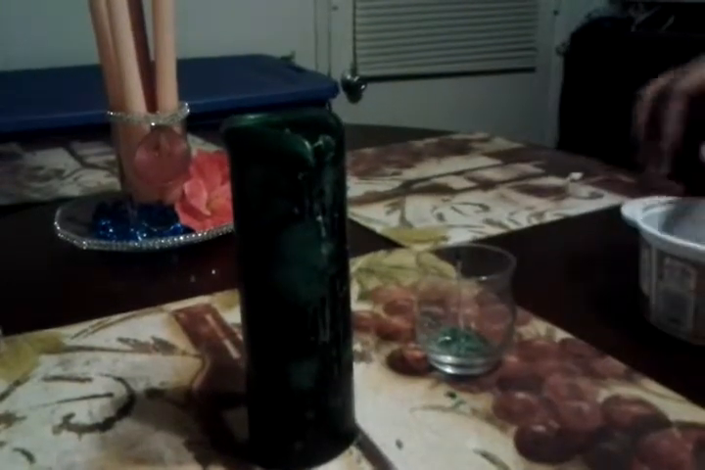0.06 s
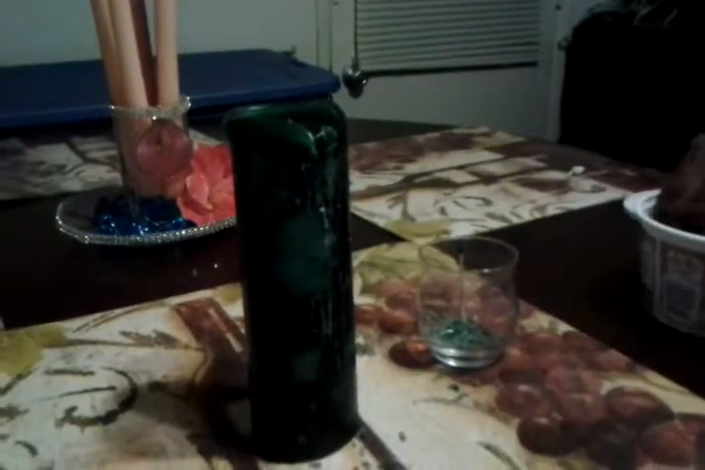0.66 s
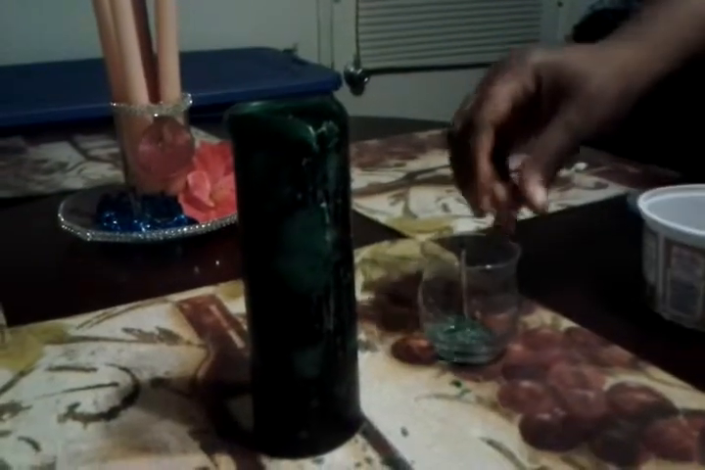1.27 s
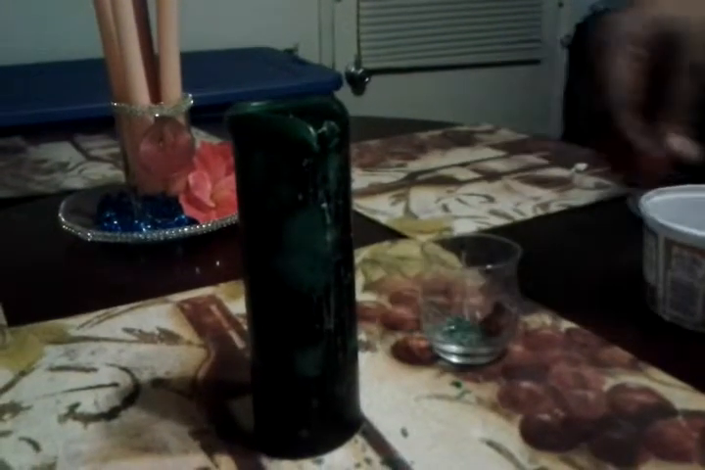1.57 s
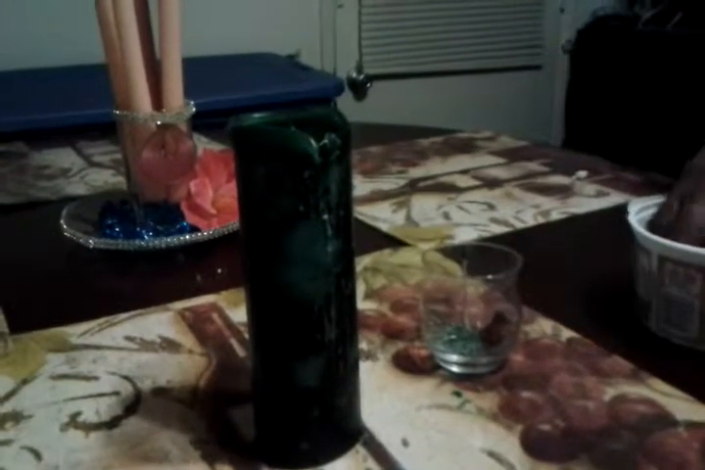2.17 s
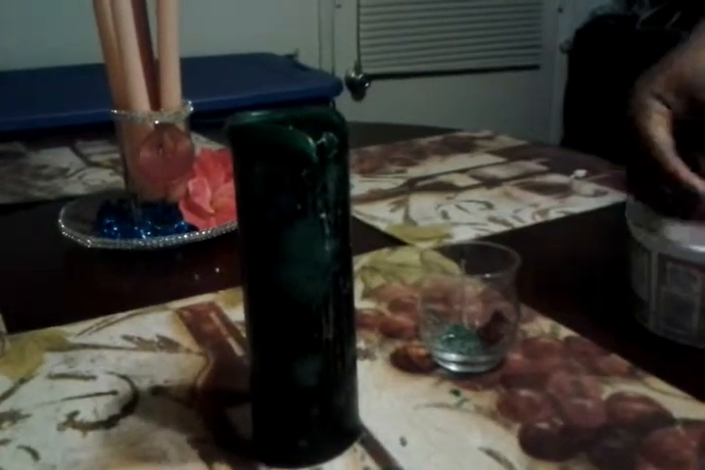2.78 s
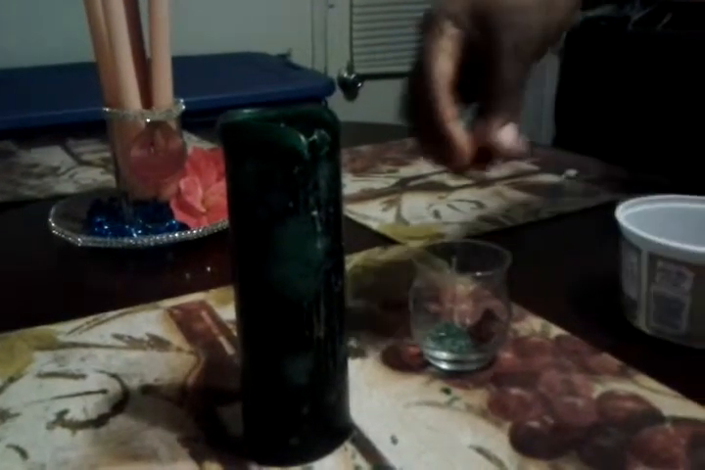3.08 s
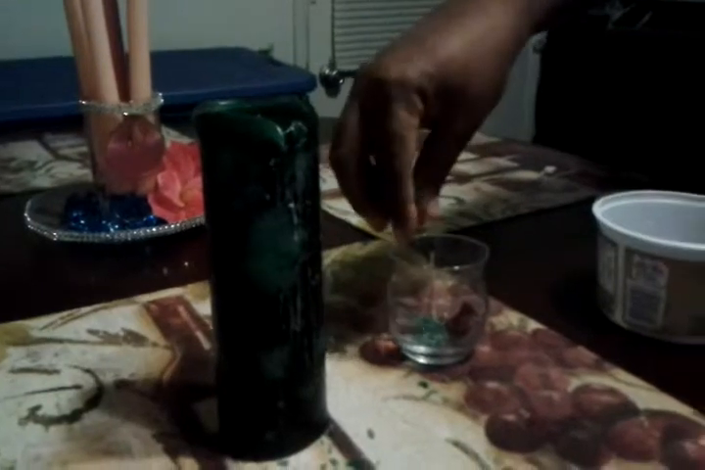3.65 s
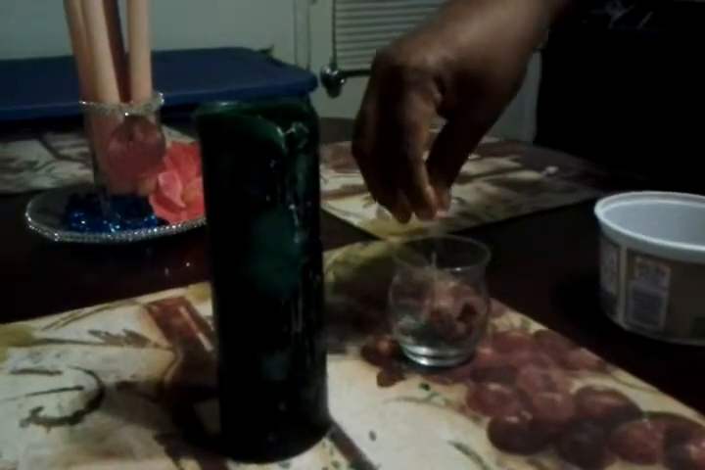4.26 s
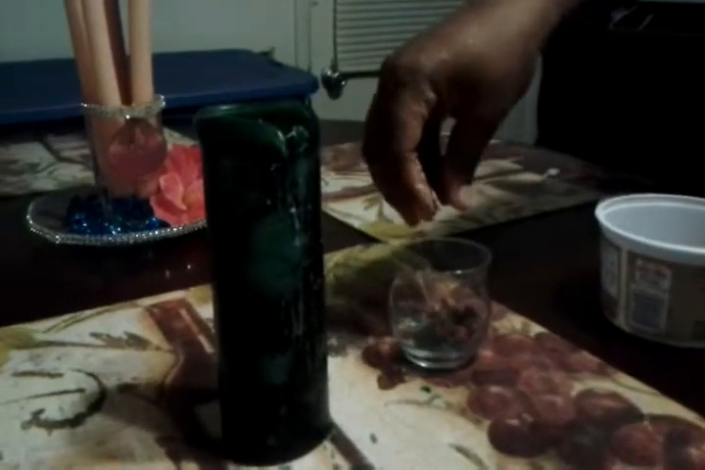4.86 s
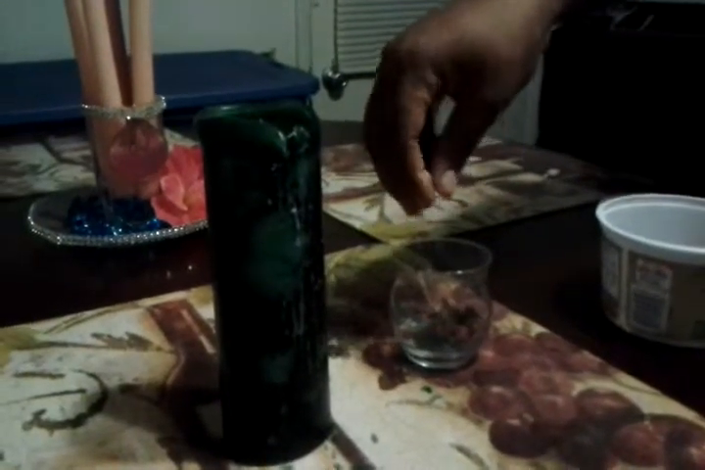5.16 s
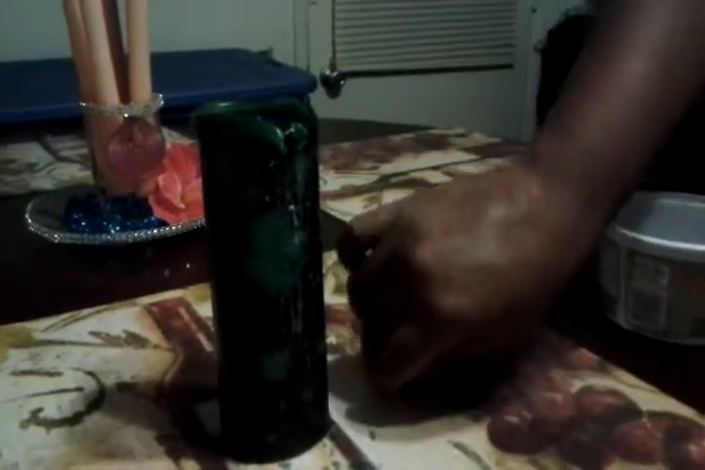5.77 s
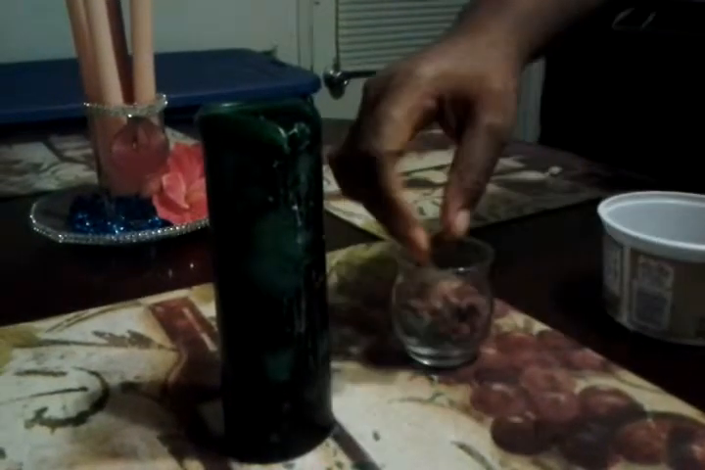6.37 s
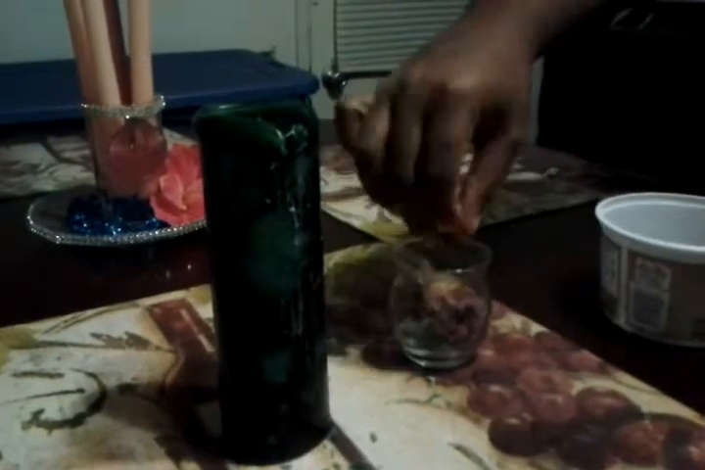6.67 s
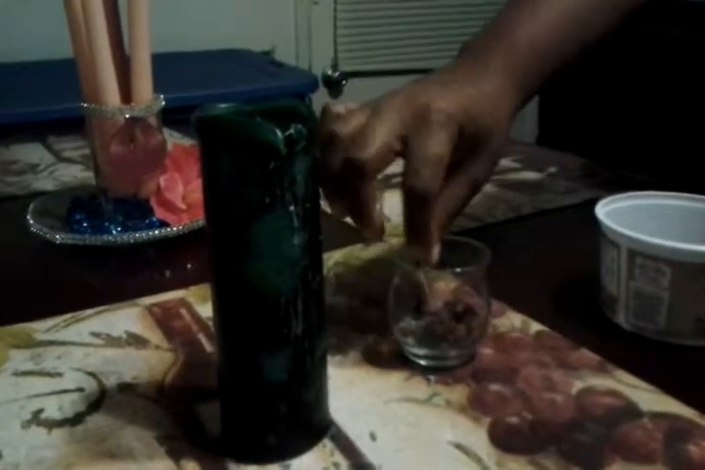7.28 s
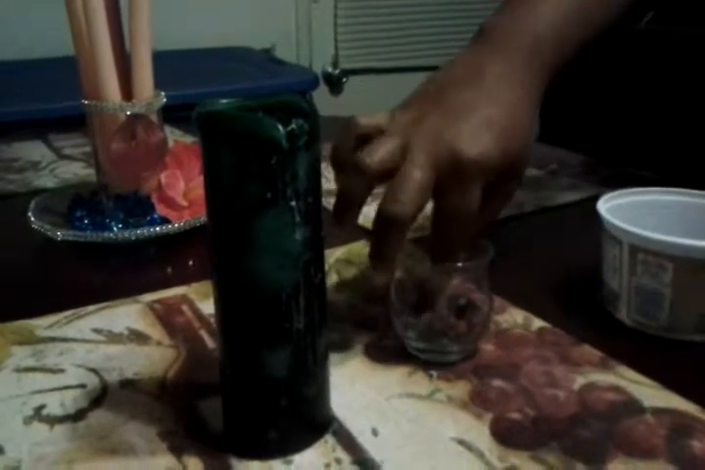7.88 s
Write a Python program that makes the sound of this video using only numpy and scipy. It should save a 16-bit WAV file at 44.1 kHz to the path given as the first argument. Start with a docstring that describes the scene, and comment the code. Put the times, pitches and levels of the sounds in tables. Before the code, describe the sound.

Fingers rummage through wax pieces in a plastic tub, making light crackles and clicks. Bits snap off crisply and drop into a nearby glass holder, pinging the wall and tapping the bottom. Midway, one heavy piece lands with a loud crack, bounces and jolts the table. Later pings are shorter and duller, with faint rubbing and another snap. The small room echoes slightly over low air rumble and microphone hiss.

```python
"""Fingers rummage in a plastic tub of wax pieces, over a low air rumble and microphone hiss.
They snap bits off and drop them into a glass holder on a cloth-covered table. The bits ping the
glass wall, bounce and knock on the bottom; the growing heap, then the fingers, shorten the ringing.
Wax rubs softly over the glass, and one heavy piece jolts the table. A small room echoes the sounds."""
import sys
import numpy as np
from scipy import signal
from scipy.fft import rfft, irfft
from scipy.io import wavfile
from scipy.ndimage import uniform_filter1d

SR = 44100
rng = np.random.default_rng(int(sys.argv[2]) if len(sys.argv) > 2 else 0)


def unload_audio(sound):
    """Save the sound as a 16-bit wav file, at the path given as the first command line argument."""
    columns = np.transpose(np.atleast_2d(sound))
    # keep every value between -1 and 1, then stretch to whole-number steps
    steps = np.round(np.clip(columns, -1, 1) * 32767)
    wavfile.write(sys.argv[1], SR, steps.astype(np.int16))


N = 350154
TIME = np.arange(N) / SR


def from_db(db):
    """Turn decibels into a gain."""
    return 10 ** (np.asarray(db) / 20)


def rms_one(x):
    """Scale a sound to an average strength (rms) of 1."""
    return x / np.sqrt(np.mean(x ** 2) + 1e-20)


def at_hz(points, hz):
    """Read between the rows of a table, with frequency spaced in octaves."""
    freqs, values = np.transpose(points)
    return np.interp(np.log(np.maximum(hz, 1)), np.log(freqs), values)


def colour(x, spectrum, size=4096):
    """Give a sound a tone colour from rows of f/Hz, level/dB (a minimum-phase filter)."""
    cepstrum = irfft(np.log(from_db(at_hz(spectrum, np.fft.rfftfreq(size, 1 / SR)))))
    cepstrum[1:size // 2] *= 2
    cepstrum[size // 2 + 1:] = 0   # nothing sounds before the blow
    return signal.fftconvolve(x, irfft(np.exp(rfft(cepstrum))))[:len(x)]


def add(out, s, sound):
    """Mix a short sound in at s seconds."""
    start = max(round(s * SR), 0)
    out[start:start + len(sound)] += sound[:N - start]


def unit_hit(sound, ms):
    """Give a blow the energy of a level of 1 held for ms milliseconds."""
    return sound / np.sqrt(np.sum(sound ** 2) * 1000 / (ms * SR))


def evened(burst, width_hz):
    """Level out the chance peaks in a noise burst's tone, so that only the struck body colours it."""
    power = uniform_filter1d(np.abs(rfft(burst)) ** 2, max(round(width_hz * len(burst) / SR), 1))
    freqs = np.fft.rfftfreq(len(burst), 1 / SR)
    return colour(burst, np.column_stack([freqs, -10 * np.log10(power + 1e-9)])[1:])


def effort(strokes, attack_db_per_s=1295, sag_db_per_s=58, release_db_per_s=326):
    """How hard the fingers work: each stroke bites quickly, eases and lets go."""
    gain = np.zeros(N)
    for s, length, db in strokes:
        t = TIME - s
        fall_db = (attack_db_per_s * np.maximum(-t, 0) + sag_db_per_s * np.maximum(t, 0)
                   + release_db_per_s * np.maximum(t - length, 0))
        gain += from_db(db - np.minimum(fall_db, 120))
    return gain


def rustle(gain, spectrum, per_s, spread_db):
    """Tiny random slips of uneven size, as strong as the fingers' effort."""
    sizes = from_db(spread_db * np.minimum(rng.exponential(1, N), 4))
    slips = sizes * rng.choice([-1, 1], N) * (rng.random(N) < per_s / SR)
    return gain * rms_one(colour(slips, spectrum))


def ring(hz, t60, size=22050):
    """One struck tone; its ring time t60 is the seconds it takes to fade by 60 dB."""
    return np.sin(2 * np.pi * hz * TIME[:size]) * from_db(-60 * TIME[:size] / t60)


def contact(spectrum, ms, crumble, size=4096):
    """A click: a sharp touch, then a brief crumbling of the wax."""
    fade = np.exp(-(1000 * TIME[:size] / max(ms, .1)) ** 2)
    force = crumble * rng.standard_normal(size) * fade
    force[0] = 1
    return unit_hit(colour(evened(force, width_hz=900), spectrum), ms=0.25)


def thud(spectrum, t60, size=8192):
    """A struck body whose many close tones die fast and blur into noise."""
    burst = rng.standard_normal(size) * from_db(-60 * TIME[:size] / t60)
    return unit_hit(colour(evened(burst, width_hz=90), spectrum), ms=2)


# The fingers dig into the tub: t/s, length/s, level/dB (levels in the tables are relative)
TUB_DIGS = [(0.003, 0.011, -39.5), (.285, .025, -53), (.48, 0.046, -43.5), (.58, 0.08, -49.5),
            (.672, 0.021, -45.5), (.79, .1, -51), (1.826, 0.076, -37.5), (1.94, 0.015, -25.5),
            (2.08, 0.04, -38.5), (2.2, 0.051, -41), (2.335, 0.014, -29), (2.45, 0.096, -41.5),
            (2.572, 0.13, -40)]
# Tone colour of wax moving in the tub: f/Hz, level/dB
TUB_COLOUR = [(100, -32), (260, -16), (500, -24.5), (850, -5), (1250, -17), (1700, -14), (2100, -9.5),
              (2700, -15.5), (4400, -4.5), (5600, -3), (6700, 1.5), (7600, -3.5), (8800, -27.5)]
# The loudest clicks of pieces in the tub: t/s, level/dB, f/Hz
TUB_CLICKS = [(.0074, -26, 6740), (0.4746, -33, 6000), (.483, -27, 5550), (.5143, -24.5, 5500),
              (.618, -29, 4740), (0.677, -25.5, 6700), (.701, -20.5, 5450), (.7308, -23, 4800),
              (.751, -21, 5660), (0.857, -20.5, 6300), (0.9157, -23, 6700), (1.8257, -13, 6800),
              (1.923, -14.5, 6700), (1.9499, -9.5, 6560), (1.9515, -3, 5700), (1.954, -6.5, 6300),
              (2.074, -23, 4860), (2.1562, -18.5, 6200), (2.176, -18, 6000), (2.2077, -13.5, 4800),
              (2.231, -30, 5600), (2.3248, -16, 5000), (2.3414, -17.5, 4650), (2.354, -20, 6600),
              (2.569, -24, 6600), (2.627, -24, 5800), (2.645, -23.5, 5700), (2.6778, -19.5, 6160),
              (2.686, -24, 6100)]
# The hand bumps the tub: t/s, level/dB
TUB_BUMPS = [(0.926, -40), (1.823, -29), (1.95, -26), (2.34, -34), (2.68, -40)]
# Tone colour of the plastic wall: f/Hz, level/dB
PLASTIC_COLOUR = [(80, -20), (270, 3), (480, -6), (820, 5), (1150, -2.5), (1450, -28), (1850, 1),
                  (3000, -12)]
def tub(peak_db=7.0, peak_octaves=0.33):
    """Digging scrapes, crackles and rings the air in the tub; pieces click and the hand bumps it."""
    digging = effort(TUB_DIGS)
    scrape = from_db(-3) * rustle(digging, TUB_COLOUR, per_s=800, spread_db=2.5)
    crackle = from_db(-9) * rustle(digging, TUB_COLOUR, per_s=110, spread_db=4.0)
    hollow = from_db(-42.5) * signal.fftconvolve(scrape + crackle, ring(hz=875, t60=0.092))[:N]
    out = scrape + crackle + hollow
    freqs = np.geomspace(100, 10000, 90)
    for s, db, hz in TUB_CLICKS:
        own_pitch = peak_db * np.exp(-(np.log2(freqs / hz) / peak_octaves) ** 2)
        spectrum = np.column_stack([freqs, at_hz(TUB_COLOUR, freqs) + own_pitch])
        add(out, s, from_db(db - 1.5) * contact(spectrum, ms=2.4, crumble=1.0))
    for s, db in TUB_BUMPS:
        add(out, s, from_db(db) * thud(PLASTIC_COLOUR, t60=0.069))
    return out


# Tone colour of the air rumble: f/Hz, level/dB
RUMBLE_COLOUR = [(15, -60), (25, -28.5), (118, -10.5), (176, -3), (264, -6.5), (294, -5), (326, -11),
                 (412, -7.5), (499, -10.5), (543, -11.5), (1030, -15), (1410, -17.5), (4000, -26),
                 (5200, -38), (8800, -120)]
# Tone colour of the microphone hiss: f/Hz, level/dB
HISS_COLOUR = [(2500, -18), (4000, -6), (5300, -2), (6300, 4.5), (7100, 7), (7800, -3), (8600, -9),
               (9000, -48)]
# Hum and electronic whine: f/Hz, level/dB
STEADY_TONES = [(291, -69.5), (538, -74), (6164, -71), (7515, -77), (7542, -68.5), (8470, -89)]
def background(swell_from_s=7.5, swell_db_per_s=3.0):
    """Air rumble that swells slightly at the end, microphone hiss and a few faint steady tones."""
    rumble_db = -58 + swell_db_per_s * np.maximum(TIME - swell_from_s, 0)
    rumble = from_db(rumble_db) * rms_one(colour(rng.standard_normal(N), RUMBLE_COLOUR))
    hiss = from_db(-59) * rms_one(colour(rng.standard_normal(N), HISS_COLOUR))
    tones = sum(np.sqrt(2) * from_db(db) * np.sin(2 * np.pi * (hz * TIME + rng.random()))
                for hz, db in STEADY_TONES)
    return rumble + hiss + tones


# Wax snaps between the fingers: t/s, level/dB, f/Hz
SNAPS = [(1.0554, -19, 5140), (1.292, -40, 7340), (2.796, -35, 6550), (2.996, -35.5, 6700),
         (3.0116, -14.5, 5280), (3.938, -11, 6640), (4.446, -26, 6100), (5.033, -37.5, 7160),
         (5.394, -37, 7400), (5.423, -37, 7100), (5.451, -35.5, 6800), (5.668, -35, 7060),
         (6.989, -40, 7000), (6.998, -16, 6700)]
# Tone colour shared by all snaps: f/Hz, level/dB
SNAP_COLOUR = [(2800, -1), (5400, 1.5), (7100, 8), (7800, -7), (8800, -19.5)]
def snaps(high_slope=15.5, rounding_octaves=0.057, knock_db=-23.5):
    """Brittle cracks, each strongest around a pitch set by the size of the piece."""
    out, freqs = np.zeros(N), np.geomspace(400, 10000, 60)
    for s, db, hz in SNAPS:
        octaves = np.log2(freqs / hz)
        low_slope = 16 * (hz / 6500) ** 1.44   # a smaller, higher piece has less below its pitch
        slope = np.where(octaves < 0, low_slope, high_slope)   # dB per octave
        # a rounded peak at the pitch, over a weak, broad knock
        peak = (rounding_octaves - np.hypot(octaves, rounding_octaves)) * slope
        shape = np.maximum(peak, knock_db) + at_hz(SNAP_COLOUR, freqs)
        ms = 1.97 * 2 ** ((db + 18.5) / 11.5)   # a stronger snap crumbles for longer
        add(out, s, from_db(db + 0.5) * contact(np.column_stack([freqs, shape]), ms, crumble=0.2))
    return out


def waver(rate_hz, depth, size=22050):
    """A gain that wanders around 1."""
    lowpass = signal.butter(2, rate_hz, fs=SR, output="sos")
    slow = signal.sosfilt(lowpass, rng.standard_normal(2 * size))[size:]
    return 1 + depth * rms_one(slow)


# The wall's low, middle and high bell tones, each split into a pair by the uneven rim:
# lower f/Hz, upper f/Hz, ring time/s before it is multiplied by ring_factor
WALL_PAIRS = [(2000, 2041, .32), (4680, 4730, .2), (7451, 7498, .17)]
def glass_wall(levels_db, upper_share, ring_factor):
    """The wall rings in three pulsing pairs and one top tone; loose wax makes the pairs waver."""
    out = 0
    for (lower_hz, upper_hz, t60), db in zip(WALL_PAIRS, levels_db):
        lower = np.sqrt(1 - upper_share) * ring(lower_hz, ring_factor * t60)
        upper = np.sqrt(upper_share) * ring(upper_hz, ring_factor * t60)
        out = out + from_db(db) * (lower + upper) * waver(rate_hz=70, depth=.2)
    top = from_db(levels_db[-1] - 22.5) * ring(hz=8548, t60=ring_factor * 0.23)
    return from_db(-2.5) * (out + top)


# How long the wall rings as the scene goes on: t/s, ring time factor
WALL_DAMPING = [(1.5, 1.16), (4.1, 1.1), (4.75, 0.71), (4.9, 0.42), (7.0, 0.36)]
def damping(s):
    """The growing heap of wax, then the fingers, shorten the wall's ring."""
    return np.interp(s, *np.transpose(WALL_DAMPING))


# Tones of the glass base: f/Hz, level/dB, ring time/s
BASE_TONES = [(1208, -11, 0.056), (1327, -15.5, 0.07), (3560, -11, 0.037)]
# Tone colour of the base with wax lying on it: f/Hz, level/dB
BASE_COLOUR = [(60, -25), (250, -9), (420, -8.5), (600, -12.5), (850, -1), (1200, -1), (1420, -8),
               (1700, -16), (2900, -23), (3350, -9.5), (3600, 0.5), (4000, -14), (6000, -25)]
def glass_base(ring_db):
    """The base thuds and rings on; the loose wax shifts its pitch a little each time."""
    detune = 1 + 0.018 * rng.standard_normal()
    out = sum(from_db(ring_db + db) * ring(hz * detune, t60) for hz, db, t60 in BASE_TONES)
    add(out, 0, from_db(-6) * thud(BASE_COLOUR, t60=0.028))
    return out


# Tone colour of wax touching glass: f/Hz, level/dB
WAX_COLOUR = [(200, -16.5), (1000, -22), (2600, -15.5), (4000, -12), (5500, 0.5), (6800, 6.5), (7700, -1.5),
              (8800, -22)]
def wax_click():
    """A bit of wax hits the glass and crumbles a little."""
    return contact(WAX_COLOUR, ms=1.0, crumble=0.65)


# A piece hits the wall: t/s, click level/dB, ring level/dB, middle pair above low pair/dB,
# share of each pair's energy in its upper tone (0-1)
PINGS = [(1.4982, -31, -34.5, -2, 0.99), (3.751, -33, -45, -5, 0.47), (3.756, -24.5, -51, 22, 0.96),
         (3.817, -25.5, -49, 8, 0), (4.075, -38, -46.5, 1.5, 0), (4.245, -19, -41, 11, 1),
         (4.285, -21.5, -60, 18.5, .8), (4.695, -24.5, -29.5, -9, 1), (4.711, -40, -46.5, 24, 1),
         (4.753, -25.5, -33.5, 0, 0.93), (4.898, -23, -40.5, 7.5, 1), (5.282, -25.5, -55.5, 10, 1),
         (6.998, -29, -53.5, -10, .5), (7.044, -47, -40.5, 1, 0.07), (7.372, -55, -53.5, -3, 1)]
def pings():
    """A blow on the wall clicks, rings the wall and knocks the base, whose tones hardly start."""
    out = np.zeros(N)
    for s, click_db, ring_db, middle_db, upper_share in PINGS:
        pair_levels = [ring_db, ring_db + middle_db, click_db - 19.5]
        add(out, s, from_db(ring_db - 4.5) * glass_base(ring_db=-6.5))
        add(out, s, glass_wall(pair_levels, upper_share, damping(s)))
        add(out, s, from_db(click_db) * wax_click())
    return out


# A piece lands on the bottom: t/s, click level/dB, knock level/dB
LANDINGS = [(1.533, -22.5, -28), (3.870, -27.5, -43.5), (4.1332, 0.5, -18), (4.136, -6, -24.5),
            (4.154, -6, -25), (4.188, -12, -55), (4.332, -23.5, -49), (4.731, -15.5, -38),
            (4.884, -27, -39), (5.256, -30.5, -46)]
def landings(pair_levels_db=(-34.5, -25.5, -23.5)):
    """A landing clicks and knocks the base; the wall rings only faintly."""
    out = np.zeros(N)
    for s, click_db, knock_db in LANDINGS:
        add(out, s, from_db(knock_db) * glass_base(ring_db=0))
        wall = glass_wall(pair_levels_db, upper_share=0.4, ring_factor=damping(s))
        add(out, s, from_db(click_db) * wall)
        add(out, s, from_db(click_db) * wax_click())
    return out


# The fingers rub wax over the glass: t/s, length/s, level/dB
RUBS = [(1.67, 0.026, -58.5), (5.97, .08, -53.5), (6.675, 0.06, -52), (6.865, 0.011, -52)]
def rubs():
    """Wax slides over glass in a dense run of tiny slips."""
    return rustle(effort(RUBS), WAX_COLOUR, per_s=3600, spread_db=6.5)


# The heavy piece jolts the table: t/s, level/dB
JOLTS = [(4.155, -17)]
# Tone colour of the table top: f/Hz, level/dB
TABLE_COLOUR = [(25, -3), (70, 6), (140, 2.5), (250, -6), (450, 2), (700, -18), (1400, -5), (3000, -10.5)]
def table_jolt(pair_levels_db=(-4, 1, 9)):
    """The table thuds and the whole wall rings, briefly because the glass is loaded."""
    out = np.zeros(N)
    for s, db in JOLTS:
        add(out, s, from_db(db) * glass_wall(pair_levels_db, upper_share=0.1, ring_factor=0.53))
        add(out, s, from_db(db) * thud(TABLE_COLOUR, t60=0.041))
    return out


# How long the small room rings: f/Hz, ring time/s
ROOM_RING_TIMES = [(100, 0.16), (1000, 0.61), (4000, 0.37), (8000, 0.31)]
def room(x, early_db, tail_db, early_t60=0.094, gap_s=0.0043, echoes_per_s=2500, size=22050):
    """Add separate echoes from things on the table, then the short tail of the room."""
    t, tail = TIME[:size], 0
    edges_hz = np.geomspace(40, 12000, 9)
    for low, high in zip(edges_hz, edges_hz[1:]):
        bandpass = signal.butter(2, [low, high], "band", fs=SR, output="sos")
        band = signal.sosfilt(bandpass, rng.standard_normal(size))
        tail = tail + band * from_db(-60 * t / at_hz(ROOM_RING_TIMES, np.sqrt(low * high)))
    echoes = rng.standard_normal(size) * (rng.random(size) < echoes_per_s / SR)
    early = echoes * from_db(-60 * t / early_t60) * (t > gap_s)
    response = from_db(early_db) * rms_one(early) + from_db(tail_db) * rms_one(tail * (t > 2 * gap_s))
    return x + signal.fftconvolve(x, response / np.sqrt(size))[:N]


def scene():
    """The glass stands near the microphone, the hand is above it, the tub a little farther off."""
    holder = room(pings() + landings() + table_jolt(), early_db=-5.0, tail_db=-15.0)
    hand = room(snaps() + rubs(), early_db=-6.5, tail_db=-11.5)
    rummaging = room(tub(), early_db=-8.5, tail_db=-12.0)
    return (holder + hand + rummaging + background())[None]


def record(dry, cutoff_hz=8650, ceiling=0.74, top_hz=16000):
    """The microphone cuts off high treble; the loudest crack overloads it and spills past that edge."""
    narrow = signal.sosfilt(signal.ellip(8, .1, 80, cutoff_hz, fs=SR, output="sos"), dry)
    clipped = narrow / (1 + (narrow / ceiling) ** 12) ** (1 / 12)
    return signal.sosfilt(signal.ellip(10, .1, 90, top_hz, fs=SR, output="sos"), clipped)


dry = scene()
out = record(dry)
unload_audio(out)
```